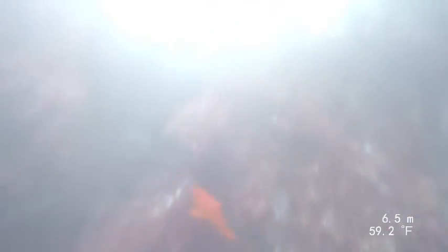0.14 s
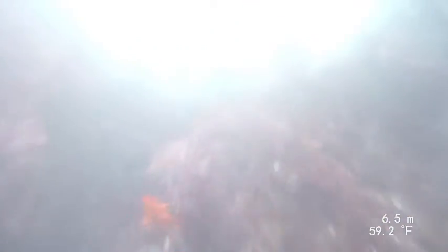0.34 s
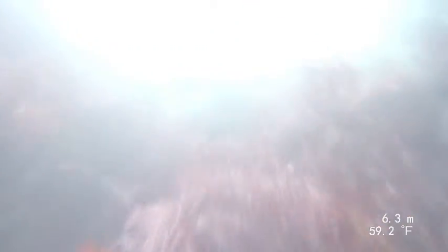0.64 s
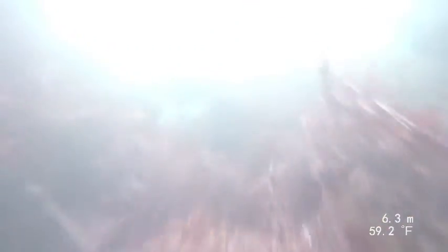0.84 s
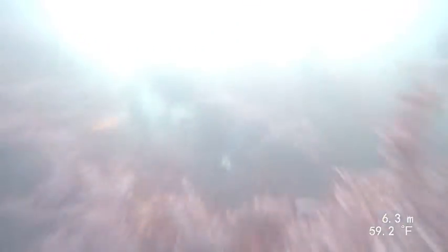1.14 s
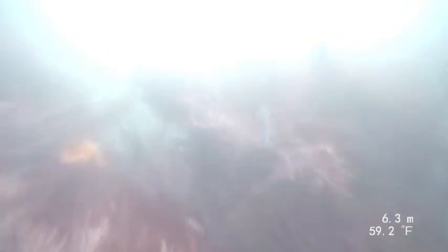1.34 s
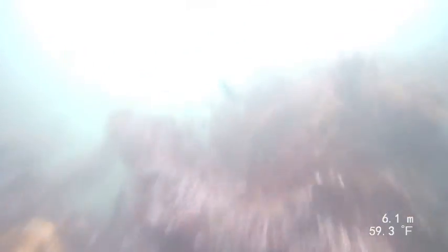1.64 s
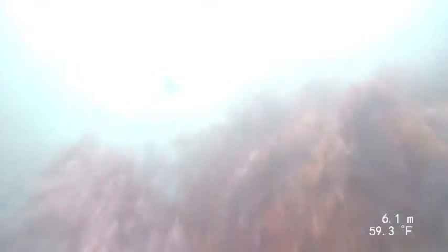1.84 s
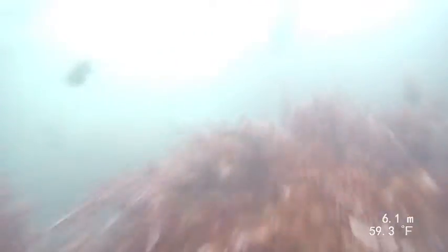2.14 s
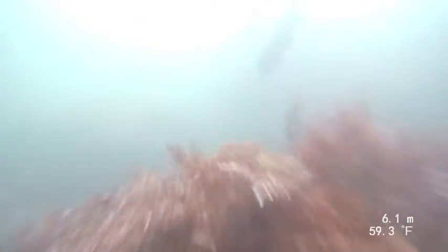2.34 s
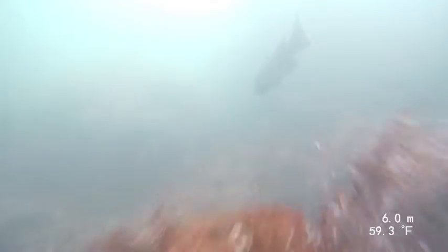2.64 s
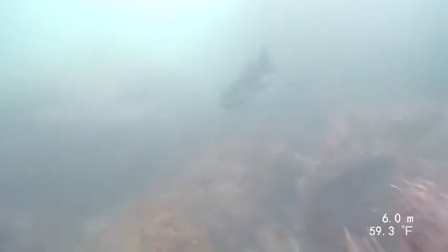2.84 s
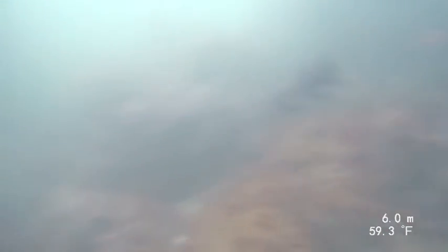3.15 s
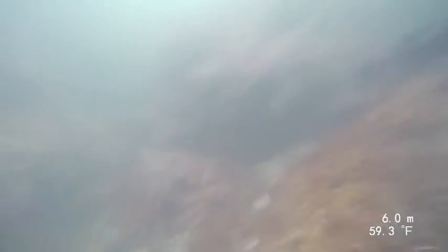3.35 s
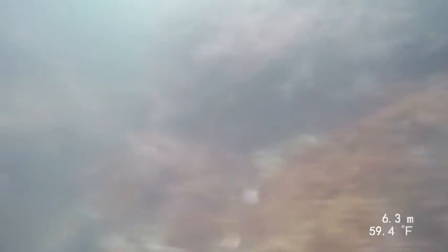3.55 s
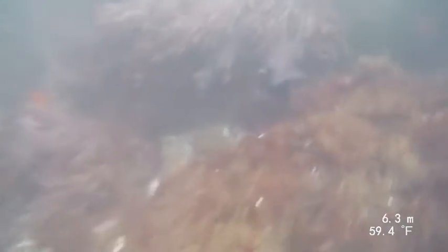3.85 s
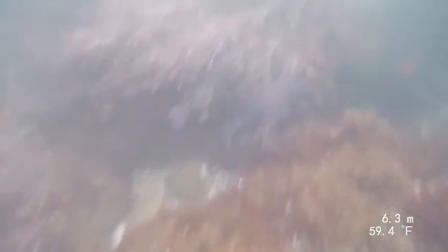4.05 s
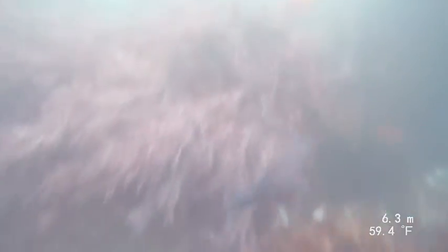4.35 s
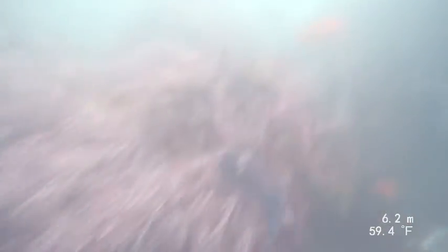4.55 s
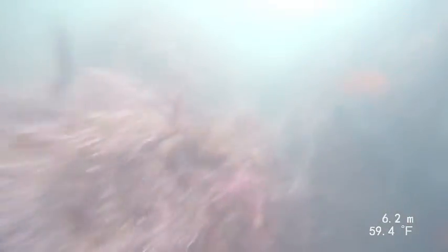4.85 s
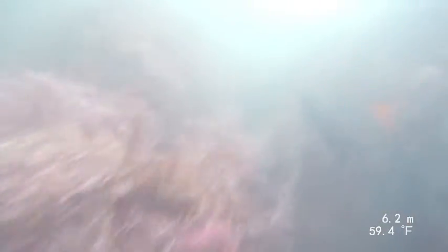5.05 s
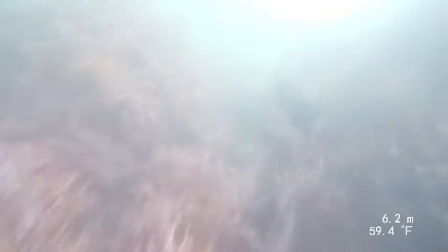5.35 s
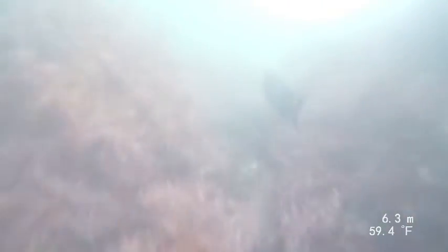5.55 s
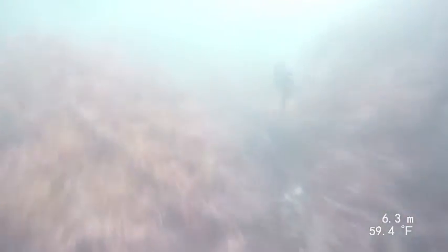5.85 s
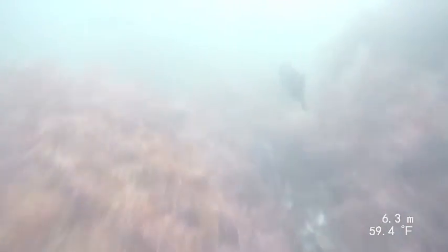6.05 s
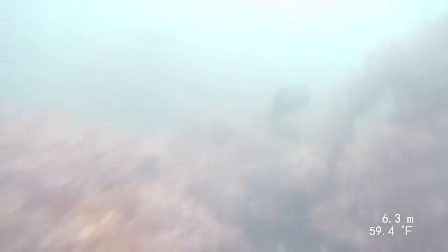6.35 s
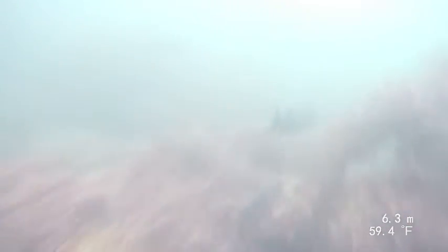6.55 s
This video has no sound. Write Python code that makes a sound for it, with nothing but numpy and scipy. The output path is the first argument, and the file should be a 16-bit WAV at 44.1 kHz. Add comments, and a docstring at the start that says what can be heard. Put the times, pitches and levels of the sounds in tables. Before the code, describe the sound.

Underwater on a weedy reef with small fish, heard by a microphone sealed in a camera housing. From 0 s there is quiet steady hiss, a faint dense crackle of distant shrimp and a soft low rumble of water that swells unevenly. Small dry snaps tick irregularly, somewhat stronger around 1.0, 1.1 and 2.05 s. At about 2.2 s trapped air starts escaping close by: a fast crackling, gurgling stream, with its loudest hollow plops near 2.3 s, ringing the shell around a midrange pitch. From 2.6 s it loosens into uneven single glugs, with bright fizzing bubbles and a sharp snap near 2.8 s, fading out by 3.25 s. One or two tiny blips follow. Afterwards the quiet returns, the rumble subsiding, with scattered clicks until 6.7 s, the clearest near 4.5, 5.85 and 5.95 s.

```python
"""Under water on a reef, heard by the microphone inside a sealed camera housing.
Shrimp snap near and far: short noise bursts that ring the resonances of the housing.
For about a second trapped air escapes as a crackling stream of bubbles: damped tones shed by
glug after glug, ringing the housing's gaps and cavity, with a few louder bubbles on top.
Behind it all: filtered noise for water flow on the shell, and preamplifier hiss."""
import sys
import numpy as np
from scipy.fft import rfft, irfft, next_fast_len
from scipy.io import wavfile
from scipy.ndimage import uniform_filter1d, map_coordinates

SR = 44100
rng = np.random.default_rng(int(sys.argv[2]) if len(sys.argv) > 2 else 0)


def bounce(signal):
    """Save signal as a 16-bit WAV file at the path given by the first command-line argument."""
    frames = np.transpose(np.atleast_2d(signal))
    limited = np.clip(frames, -1, 1)
    pcm = np.round(limited * 32767).astype(np.int16)
    wavfile.write(sys.argv[1], SR, pcm)


N = 295027  # length in samples

# Housing resonances in three groups: centre_hz, width_hz, level_db (relative)
LOW_MODES = [(1950, 220, -1.5), (2787, 450, 0.5), (3476, 460, -6)]
MIDDLE_MODES = [(4030, 476, -3.5), (4655, 390, 1.5), (6063, 243, 6.5)]
HIGH_MODES = [(8530, 1300, 0), (10650, 1900, -3.5), (12390, 919, -3.5), (14600, 970, -3.5)]
# Water-filled gaps of the housing, where large bubbles gurgle: centre_hz, width_hz, level_db (relative)
GAP_MODES = [(648, 120, -3), (916, 150, -1), (1248, 490, -5)]
# Cavity of the housing, rung by the bubbles: centre_hz, width_hz, level_db (relative)
CAVITY_MODES = [(1925, 440, 1.5), (2660, 380, 1.5), (3120, 1200, -7)]
# Phases of the escape: start_s, bubble_lag_ms (mean trail behind the glug), gurgle_db (over the flow)
PHASES = [(2.169, 1.2, 0), (2.296, 11.6, -5.5), (2.615, 6.65, -10.5), (2.87, 3.92, -7), (2.94, 4, -8),
          (3.11, 4.9, -21)]


def amp(db):
    """Amplitude factor of a level in dB."""
    return 10 ** (np.asarray(db) / 20)


def unit(x):
    """x scaled to an rms of 1 over its whole length."""
    return x / np.sqrt(np.mean(x ** 2) + 1e-20)


def filtered(x, response):
    """x shaped by a complex response of frequency, zero-padded for the ringing."""
    m = next_fast_len(x.shape[-1] + 4096)
    spectrum = rfft(x, m) * response(np.fft.rfftfreq(m, 1 / SR))
    return irfft(spectrum, m)[..., :x.shape[-1]]


def ringing(modes):
    """Causal response of parallel resonances, with a steep bass cut under the lowest."""
    def response(f):
        x = 1j * f / (0.4 * modes[0][0])
        bass_cut = (x / (1 + x)) ** 2
        total = 0
        for k, (centre, width, db) in enumerate(modes):
            resonance = 1j * f * width / (centre * centre - f * f + 1j * f * width)
            total = total + (-1) ** k * amp(db) * resonance  # signs alternate
        return bass_cut * total
    return response


def place(times, waves):
    """Sum the rows of waves, each from its start time in seconds."""
    at = (np.asarray(times) * SR).astype(int)[:, None] + np.arange(waves.shape[1])
    return np.bincount(at.ravel(), waves.ravel(), N + waves.shape[1])[:N]


def control(rows):
    """Gain curves from rows of time in s and levels in dB, practically silent outside them."""
    s, *levels_db = np.transpose(rows)
    return [amp(np.interp(np.arange(N) / SR, s, db, -120, -120)) for db in levels_db]


def snaps(trail_db, trail_life_s):
    """A collapsing cavity: a spike, then scattered arrivals off the rocks, ringing the housing modes."""
    # Near snaps: start_s, strength_db, brightness_db (added to the high modes, taken from the low)
    near_snaps = [(0.2089, -50.5, 6), (0.217, -46, 9.5), (0.253, -57.5, 22.5), (0.2946, -56.5, 8),
                  (0.3493, -57, 12), (0.3703, -52, 4.5), (0.4202, -52.5, 5), (0.4397, -48, 15),
                  (0.823, -51.5, 16), (0.8399, -52, 8), (0.9572, -42, -1.5), (1.124, -38.5, 5),
                  (1.2073, -50.5, 16.5), (1.215, -41.5, -7), (1.4181, -48.5, 12), (1.4578, -47.5, 10),
                  (1.6756, -58.5, 21), (2.0563, -40.5, 5), (2.1144, -45, 11.5), (2.2124, -58, 20),
                  (2.2219, -44, 17), (2.2791, -46.5, 16.5), (2.3178, -47.5, 14), (2.3695, -47, 15),
                  (2.5217, -57, 14), (2.6167, -52, 16), (2.6603, -45, 9.5), (2.7319, -45.5, 13.5),
                  (2.8247, -31.5, 3), (2.9839, -52.5, 12), (3.0261, -50.5, 10), (3.1753, -48.5, 5),
                  (3.291, -53.5, 4.5), (3.4107, -50, 0), (3.4607, -51.5, 13), (3.664, -55, 5.5),
                  (3.8907, -58, 16.5), (4.173, -54.5, 1), (4.3947, -54.5, 5.5), (4.4822, -37, 4.5),
                  (4.4857, -45.5, 17.5), (4.7493, -57.5, 17), (4.969, -52, -3.5), (5.0086, -55.5, -2.5),
                  (5.3368, -48.2, 9), (5.4094, -47, 3.5), (5.5805, -51, 7.5), (5.5991, -46, 8),
                  (5.7488, -51.5, 11), (5.859, -37, 6.5), (5.9645, -38.5, 9), (6.218, -55, 18),
                  (6.3473, -50.5, 7.5), (6.3577, -53.5, 13.5), (6.5484, -48.5, -2)]
    middle_db, high_db = 0.5, -8  # middle and high modes over the strength
    s, db, bright_db = np.transpose(near_snaps)
    group_db = db - bright_db, db + middle_db, db + bright_db + high_db
    t = np.arange(1024) / SR
    noise = rng.standard_normal((len(s), 3, len(t)))
    waves = 0
    for k, (modes, life_s) in enumerate([(LOW_MODES, .0013), (MIDDLE_MODES, .0013), (HIGH_MODES, .0008)]):
        onset = 1 - np.exp(-t / 0.0006)
        decay = np.exp(-t / life_s) + amp(trail_db) * np.exp(-t / trail_life_s)
        ring = filtered(onset * decay * noise[:, k], ringing(modes))
        # peak of the smoothed envelope, so that each group meets its level
        peak = np.sqrt(2 * uniform_filter1d(ring ** 2, size=50).max(axis=1))
        waves = waves + ring * (amp(group_db[k]) / peak)[:, None]
    return place(s, waves)


def bubbles(rise_cycles, roundness, knock_db, tick_db):
    """Bubbles that stand out: each swells as it pinches off and rings for a few cycles."""
    # start_s, tone_peak_db, pitch_hz
    loud_bubbles = [(1.7994, -57, 2760), (1.8867, -54, 1030), (1.889, -64, 1380), (2.2074, -27.5, 2036),
                    (2.217, -33, 2010), (2.231, -32, 2040), (2.239, -28.5, 2080), (2.2486, -26, 1880),
                    (2.2576, -33, 2030), (2.271, -27.5, 2170), (2.2868, -25, 1890), (2.2935, -36, 9050),
                    (2.2929, -36.5, 4900), (2.302, -8, 2050), (2.304, -36.5, 679), (2.3064, -6, 1904),
                    (2.3166, -9.5, 1960), (2.306, -27, 2740), (2.325, -36, 4800), (2.359, -34.5, 8600),
                    (2.382, -33, 6300), (2.3829, -32.5, 1850), (2.4075, -29.5, 4860), (2.413, -33.5, 4077),
                    (2.408, -31.5, 1855), (2.4203, -35, 3080), (2.4226, -34.5, 1400),
                    (2.4323, -30.5, 12600), (2.506, -38, 2800), (2.512, -38, 4880), (2.5389, -27.5, 2070),
                    (2.5799, -29, 2070), (2.5824, -33, 4770), (2.5928, -34.5, 4870), (2.621, -40, 6170),
                    (2.644, -31, 1890), (2.6443, -32, 5010), (2.693, -42, 3760), (2.714, -39.5, 1750),
                    (2.7849, -26.5, 1942), (2.7861, -34.5, 6180), (2.7959, -36, 1970),
                    (2.7984, -35.5, 8570), (2.826, -30, 4970), (2.826, -31, 12900), (2.843, -41, 3050),
                    (2.875, -37.5, 6130), (2.8744, -32, 2145), (2.96, -31, 6050), (2.969, -29, 1830),
                    (3.034, -38, 1985), (3.0471, -43, 1990), (3.0848, -39, 1970), (3.0895, -41.5, 6096),
                    (3.0928, -34, 12600), (3.2029, -51.5, 3750), (3.2196, -48.5, 5000),
                    (3.472, -50.5, 2870), (3.528, -57.5, 1870)]
    # ring time of a 2 kHz bubble at -30 dB; it shortens with pitch (power) and violence (dB per dB)
    life_ms, life_pitch, life_loud = 3.6, 0.723, 0.27
    # softer bubbles than this ring no longer; louder ones stop more abruptly, per dB
    quiet_db, loud_rounds = -34.5, 0.015
    s, db, hz = np.transpose(loud_bubbles)[..., None]
    ms = life_ms * (2000 / hz) ** life_pitch * amp(-life_loud * (np.maximum(db, quiet_db) + 30))
    t = np.arange(1500) / SR
    rise = 1 - np.exp(-(hz * t / rise_cycles) ** 2)
    fall_power = roundness + loud_rounds * np.maximum(db - quiet_db, 0)
    swell = rise * np.exp(-(1000 * t / ms) ** fall_power)
    swell = swell / swell.max(axis=1, keepdims=True)
    tone = np.sin(2 * np.pi * (hz * t + rng.random((len(s), 1))))
    noise = rng.standard_normal((len(s), 2, len(t)))
    # large bubbles jolt the gaps and the cavity of the housing; small ones start with a rough tick
    jolt = filtered(uniform_filter1d(swell * noise[:, 0], size=8), ringing(GAP_MODES + CAVITY_MODES))
    jolt = jolt / np.abs(jolt).max(axis=1, keepdims=True)
    tick = np.exp(-t / 0.0012) * unit(uniform_filter1d(noise[:, 1], size=8)) * tone
    extra = np.where(hz < 2500, amp(knock_db) * jolt, amp(tick_db) * tick)
    return place(s[:, 0], amp(db) * (swell * tone + extra))


def stream():
    """Hundreds of small bubbles a second; large ones gurgle, middling ring the cavity, tiny ones fizz."""
    # Escaping air: time_s, flow_db
    air_flow = [(2.165, -52.5), (2.28, -41), (2.4, -41.5), (2.47, -44), (2.7, -47), (3.08, -47.5),
                (3.251, -69.5)]
    fizz_db, fizz_follows = -34.5, 0.51  # fizz level, and its share of the flow's dB swings
    knock_db = -1  # the snap of water that opens each glug, over its large bubbles
    deep_fades_db = -6.5  # the deep gap modes fade as the first rush thins, return with the second surge
    t = np.arange(N) / SR
    cavity_gain, = control(air_flow)
    start, _, gurgle_db = np.transpose(PHASES)
    gurgle_gain = cavity_gain * amp(gurgle_db[np.searchsorted(start, t) - 1])
    fizz_gain = amp(fizz_db) * cavity_gain ** fizz_follows

    beat = glugs()
    large = swarm(beat, count=9, low_hz=704.0, high_hz=2500, cycles=0.22, lean=1)
    knocks = place(beat[0], -np.hanning(12) * beat[1][:, None])
    large = large + amp(knock_db) * unit(knocks)
    middling = swarm(beat, count=5, low_hz=1603, high_hz=3356, cycles=7.5, lean=1.1)
    tiny = swarm(beat, count=10, low_hz=3260, high_hz=14000, cycles=5.5, lean=1.5)

    deep_gain = amp(deep_fades_db * np.interp(t, start[[1, 2, 3, 3]], [0, 1, 1, 0]))
    whole = filtered(large, ringing(GAP_MODES))
    upper = filtered(large, ringing(GAP_MODES[2:]))
    out = gurgle_gain * unit(upper + deep_gain * (whole - upper))
    out += cavity_gain * unit(filtered(middling + large, ringing(CAVITY_MODES)))
    out += fizz_gain * unit(filtered(tiny, ringing(MIDDLE_MODES + HIGH_MODES)))
    # the bubbles fill only part of the length: bring their rms to about 1 while the air flows
    share = np.sqrt((air_flow[-1][0] - air_flow[0][0]) * SR / N)
    # the swirl of displaced water is felt as a low rumble
    rumble = filtered(rng.standard_normal(N), lambda f: ringing([(120, 300, 0)])(f) ** 2)
    return share * out + amp(-15.5) * gurgle_gain * unit(rumble)


def glugs():
    """Start in s, size factor and bubble lag in s of each glug: steady at full flow, single around it."""
    # Single glugs before and after: start_s, size_db (over the flow)
    single_glugs = [(2.1697, 0), (2.1773, 1), (2.1889, -2), (2.2007, -3), (2.62, 4.5), (2.644, 4.5),
                    (2.657, 3), (2.669, 5.5), (2.693, -2), (2.711, 1.5), (2.73, 1), (2.75, -4),
                    (2.7596, -2), (2.776, -2), (2.786, 2), (2.805, -0.5), (2.8247, 8), (2.84, -5),
                    (2.852, -5), (2.875, 8.5), (2.893, -0.5), (2.9089, -2), (2.917, -3), (2.946, -4),
                    (2.954, -1.5), (2.9805, 5), (3.001, -4.5), (3.0148, -0.5), (3.049, 2.6), (3.064, -3),
                    (3.08, -1), (3.097, 1), (3.113, -2), (3.125, -3.4), (3.141, 6), (3.158, -2.5),
                    (3.203, 7), (3.228, 1.5)]
    steady_from_s, steady_to_s, steady_per_s = 2.211, 2.612, 93.5
    jitter_s, spread_db = 0.0013, 3.5  # unevenness of the steady glugs
    start, lag_ms, _ = np.transpose(PHASES)
    steady = np.arange(steady_from_s, steady_to_s, 1 / steady_per_s)
    late, size = rng.standard_normal((200, 2))[:len(steady)].T
    single, single_db = np.transpose(single_glugs)
    s = np.append(steady + jitter_s * late, single)
    strength = amp(np.append(spread_db * size, single_db))
    phase = np.clip(np.searchsorted(start, s) - 1, 0, None)
    return s, strength, lag_ms[phase] / 1000


def swarm(beat, count, low_hz, high_hz, cycles, lean):
    """count bubbles shed by each glug: damped, slightly rising tones of unequal size; lean favours low."""
    pitch, size, life, trail = rng.random((count * len(beat[0]), 4, 1)).transpose(1, 0, 2)
    s, strength, lag = np.repeat(beat, count, axis=1)[..., None]
    hz = low_hz * (high_hz / low_hz) ** pitch ** lean
    turns = hz * np.arange(1200) / SR
    fade = turns / (cycles * (.5 + life))
    tone = np.sin(2 * np.pi * turns * (1 + 0.01725 * fade))
    waves = (1 - np.exp(-2 * turns)) * np.exp(-fade) * tone
    start = s - lag * np.log(1 - trail)  # exponentially distributed trail behind the glug
    return unit(place(start[:, 0], waves * amp(7.9 * size) * strength))


def far_snaps():
    """The distant colony: a dense faint crackle through the same housing."""
    ticks = crackle(rate=140, spread_db=2.0, top_db=20.5, life_s=0.001203)
    housing = ringing(LOW_MODES[1:] + MIDDLE_MODES + HIGH_MODES)
    return amp(-73.5) * unit(filtered(ticks, housing))


def crackle(rate, spread_db, top_db, life_s):
    """Random short noise bursts of slightly unequal size, a few louder, rate a second."""
    count = int(rate * N / SR)
    t = np.arange(256) / SR
    when, size = rng.random((count, 2)).T
    bursts = rng.standard_normal((count, len(t))) * np.exp(-t / life_s)
    burst_db = np.minimum(-spread_db * np.log(1 - size), top_db)
    return place(when * N / SR, bursts * amp(burst_db)[:, None])


def flow():
    """Water passing the shell rumbles in uneven surges, and a soft hum comes and goes."""
    # time_s, rumble_db, hum_db (levels before the surges)
    shell_flow = [(0, -77.5, -84.5), (.9, -69.5, -81), (2, -67, -79.5), (3.5, -70, -92), (5.4, -80.5, -81),
                  (6.69, -76.5, -77)]
    rumble_gain, hum_gain = control(shell_flow)

    def surge(rate):
        """Smooth random curve through rate points a second."""
        points = rng.standard_normal(int(rate * N / SR) + 4)
        return map_coordinates(points, [np.arange(N) * rate / SR])

    low = filtered(rng.standard_normal(N), lambda f: 1 / (1 + 1j * f / 35))
    mid = filtered(rng.standard_normal(N), lambda f: ringing([(590, 150, 0)])(f) ** 2)
    rumble = rumble_gain * unit(low * amp(6.2 * surge(5.5)))
    hum = hum_gain * unit(mid * amp(3.45 * surge(3.61)))
    return rumble + hum


def preamplifier_hiss():
    """Steady hiss from the electronics: white noise shaped by a fixed spectrum."""
    # Spectrum: frequency_hz, density_db (relative, per Hz)
    hiss_spectrum = [(20, -2), (100, -10), (340, -15), (1300, -20), (2000, -21), (12000, -24), (12500, -20),
                     (15200, -20), (15600, -56.5)]
    hz, db = np.transpose(hiss_spectrum)
    noise = rng.standard_normal(N)
    return amp(-66.0) * unit(filtered(noise, lambda f: amp(np.interp(np.log(f + 1), np.log(hz), db))))


def scene():
    """Near snaps and escaping air in front of the far colony, the flow and the hiss."""
    near = snaps(trail_db=-26.5, trail_life_s=0.0054)
    air = bubbles(rise_cycles=3.9, roundness=0.9, knock_db=-12.0, tick_db=-8.0) + stream()
    return (near + air + far_snaps() + flow() + preamplifier_hiss())[None]


def record(dry):
    """Band limit: the level drops above 15.3 kHz, and nothing passes above 16.6 kHz."""
    step_hz, step_db, top_hz = 15300, -7, 16600
    return filtered(dry, lambda hz: np.where(hz < step_hz, 1, amp(step_db)) * (hz < top_hz))


dry = scene()
out = record(dry)
bounce(out)
```